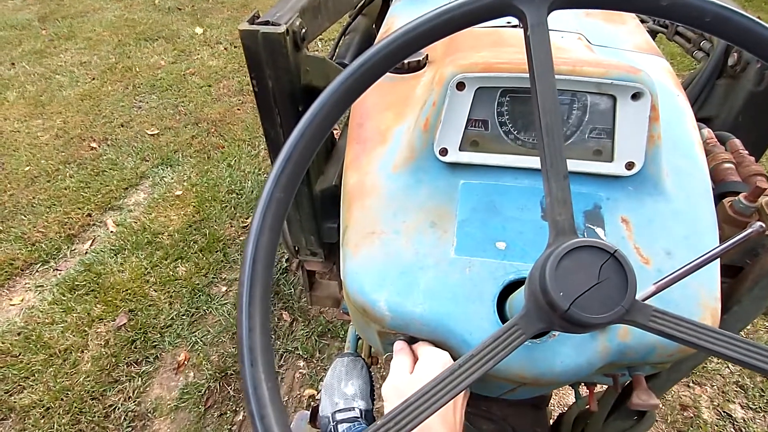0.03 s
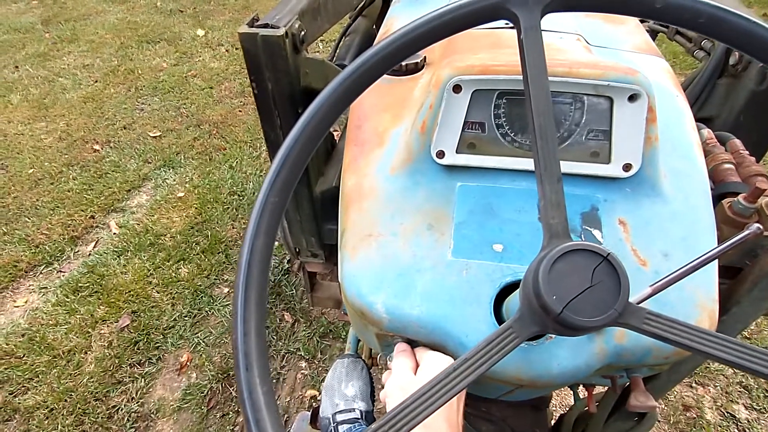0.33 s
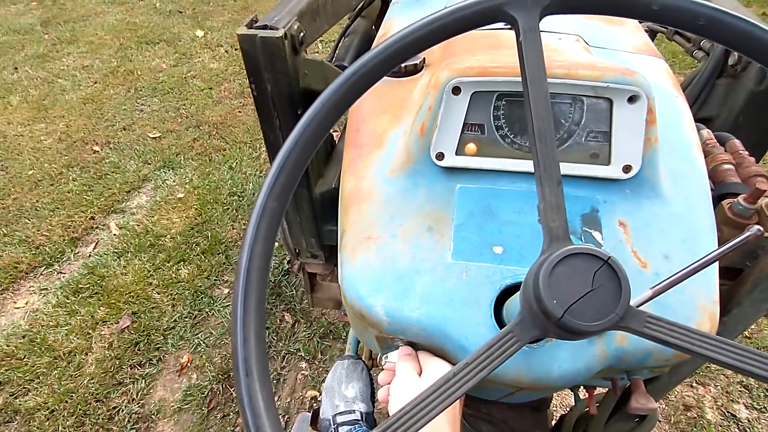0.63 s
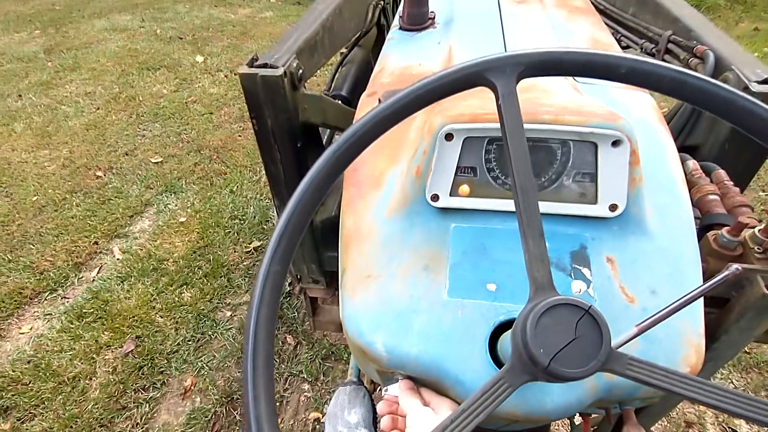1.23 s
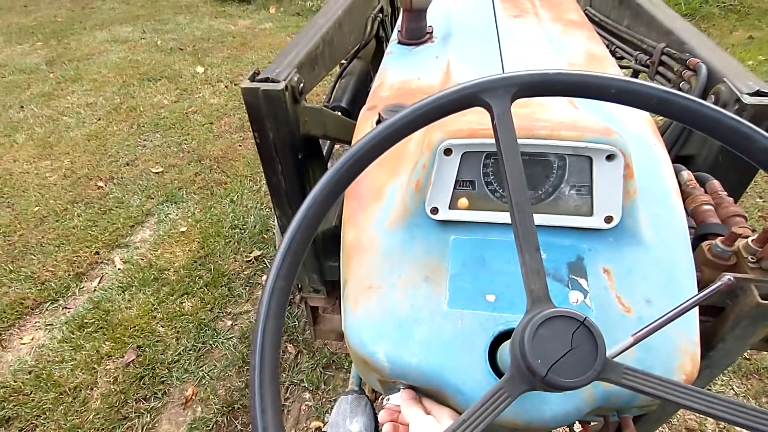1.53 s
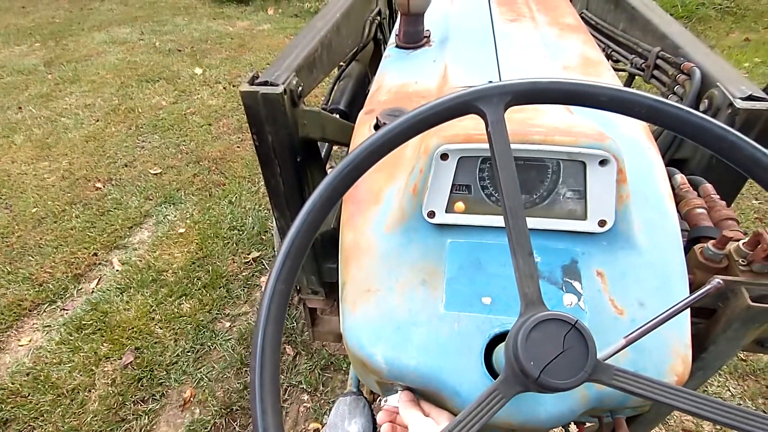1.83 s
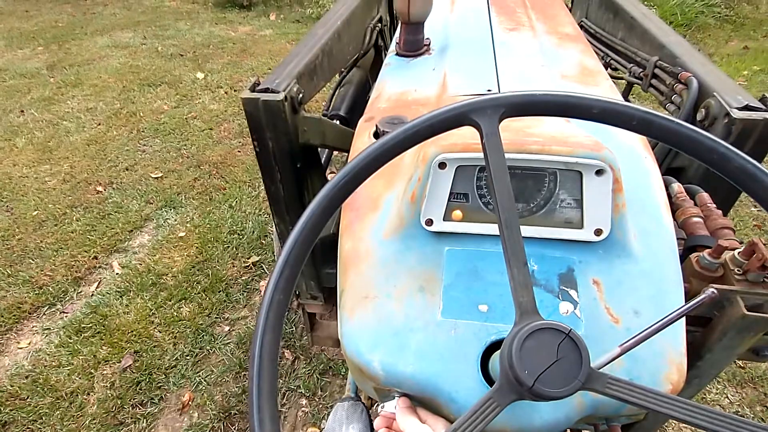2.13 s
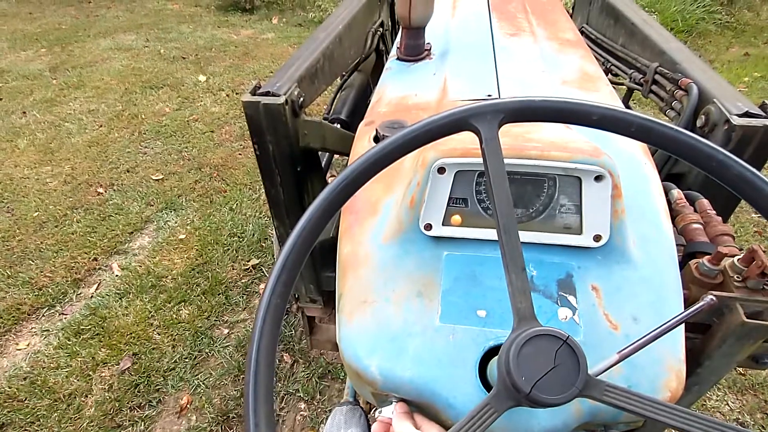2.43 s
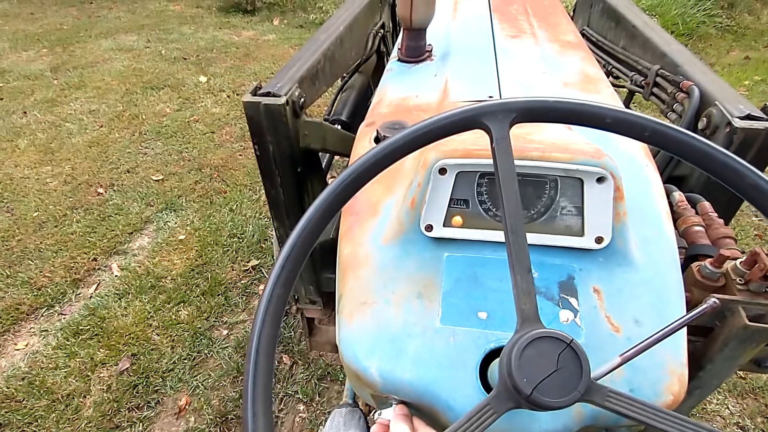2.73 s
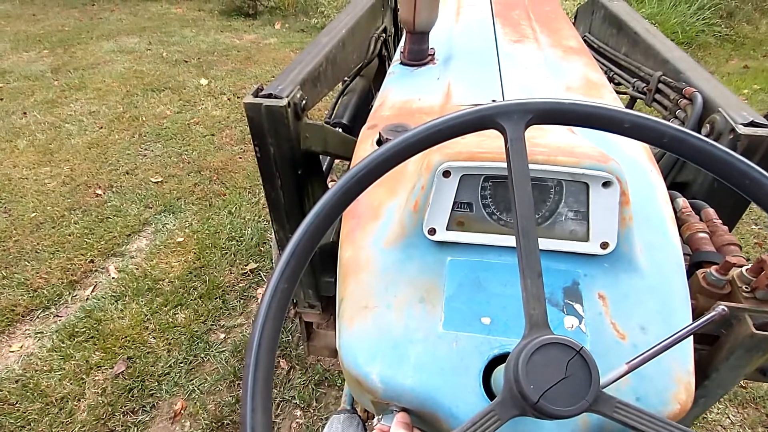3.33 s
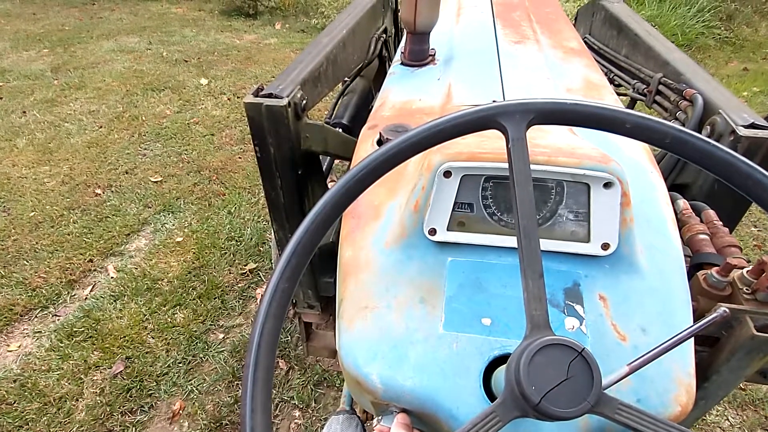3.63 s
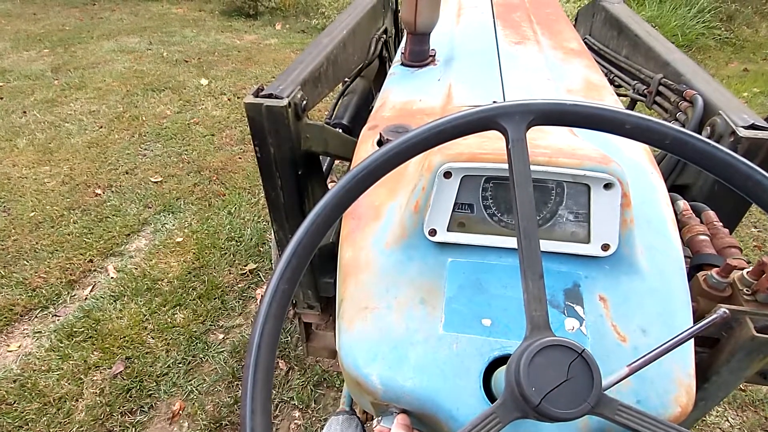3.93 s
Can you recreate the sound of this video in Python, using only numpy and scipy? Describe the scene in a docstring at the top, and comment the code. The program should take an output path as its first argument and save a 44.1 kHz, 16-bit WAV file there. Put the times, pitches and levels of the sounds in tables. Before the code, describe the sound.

An old diesel tractor's starter cranks the engine after two faint key clicks.

```python
"""A lawn, the stereo microphone close to an old diesel tractor. Insects trill far off in the open air.
The key switch clicks twice in the sheet-metal dash while a faint cricket chirps. Some three seconds in,
the starter pinion slams into the ring gear and cranks the engine: the gear whine sags at every
compression and races after it, and each stroke brings a knock and a puff from the exhaust."""
import sys
import numpy as np
from scipy import signal
from scipy.fft import rfft, irfft
from scipy.io import wavfile
from scipy.ndimage import uniform_filter1d

SR = 44100
rng = np.random.default_rng(int(sys.argv[2]) if len(sys.argv) > 2 else 0)


def output_pcm(signal):
    """Save a mono or channel-first signal as 16-bit PCM at the path in sys.argv[1].

    Samples are clipped to [-1, 1] before scaling.
    """
    pcm = np.clip(np.atleast_2d(signal).T, -1, 1) * 32767
    wavfile.write(sys.argv[1], SR, np.round(pcm).astype(np.int16))


N = 176400
T = np.arange(N) / SR

# open air over the lawn: (frequency [Hz], relative level [dB])
AIR_SPECTRUM = [(20, -46), (37, -7.5), (55, 5.5), (116, -4.5), (246, -7), (550, -16.5), (1400, -21.5),
                (1800, -18.5), (4600, -23.5), (5600, -18.5), (9400, -17.5), (10900, -32.5), (15500, -32)]
# its stereo width: (frequency [Hz], side gain [dB])
AIR_SIDE = [(60, -15.5), (290, -9.5), (640, 0)]
# its lean: (frequency [Hz], left over right [dB])
AIR_LEAN = [(6000, 0.5), (8100, -14), (10000, -11), (15000, 3.5)]
# distant insects: (pitch [Hz], pitch spread [Hz], level [dB], pulse rate [Hz], pulse depth [0-1],
# left over right [dB], time of one crest [s], glide [Hz])
INSECT_TRILLS = [(5560, 104.8, -78.5, 24, 0.4, 4, 1.2, 105), (9200, 163, -81.5, 3.6, 1, -17, 1.09, 140),
                 (8750, 133, -81.5, 3.2, 1, -15, 0.078, 66)]
# the key shifting in the fingers: (time [s], pitch [Hz])
FINGER_TICKS = [(0.075, 1270), (3.063, 1000), (3.134, 2540)]
# contacts in the key switch: (time [s], relative level [dB], treble gain [dB])
SWITCH_HITS = [(0.183, -12, -1), (0.1864, -20.5, 16), (0.1892, -9.5, 11), (.197, -0.5, -5),
               (0.6026, -11, -3), (.605, -12, -4.5), (.612, -5, -4), (.618, -5, -6), (0.635, -15, -23)]
# their tone: (frequency [Hz], relative level [dB])
SWITCH_SPECTRUM = [(70, -54), (130, -14.5), (205, -13.5), (290, -3), (420, -9), (600, -12.5), (1000, -10),
                   (1800, -13), (2800, -12.5), (6400, -15.5), (9300, -7.5), (15500, -28)]
# their decay: (frequency [Hz], T60 [s])
SWITCH_DECAY = [(200, 0.27), (1000, 0.15), (3000, 0.081), (10000, 0.043)]
# the switch snaps into its first and second position: (time [s])
DETENTS = [0.190, 0.615]
# modes of the dash: (frequency [Hz], level at first detent [dB], level at second [dB])
DASH_PANEL_MODES = [(289.8, -51.5, -51), (818, -57, -49.5), (888, -58, -54.5), (1034, -51.5, -67),
                    (1435, -46.5, -57.5), (2053, -68, -54), (2270, -53, -59), (2705, -56, -51.5),
                    (2780, -47.5, -59), (3120, -49, -65), (3340, -59, -55), (4430, -46, -72),
                    (5100, -48, -55), (5280, -49, -63)]
# starts of the cricket's chirps: (time [s])
CRICKET_CHIRPS = [.255, .73, 1.21, 1.68, 2.16, 2.605, 3.095]
# the solenoid pulls in and bottoms out: (time [s], frequency [Hz], level [dB], T60 [s])
SOLENOID_PINGS = [(3.342, 772, -52, 0.1), (3.342, 2050, -51, 0.07), (3.406, 2560, -30, .08),
                  (3.406, 2790, -29.5, .07)]
# the pinion thrown at the ring gear: (time [s], relative level [dB], treble gain [dB])
PINION_IMPACTS = [(3.342, -20, -4), (3.364, -10.5, -28), (3.371, -6, 3.5), (3.382, -0.5, 1.5),
                  (3.385, .5, 1.5), (3.408, -13, -20)]
# their tone: (frequency [Hz], relative level [dB])
PINION_SPECTRUM = [(80, -34.5), (136, -2), (446, -10), (569, 0), (809, -1.5), (1830, -8), (2660, -16.5),
                   (4040, -13.5), (6000, -24), (7830, -10), (15500, -33.5)]
# decay of the ironwork: (frequency [Hz], T60 [s])
IRON_DECAY = [(150, 0.89), (1000, 0.18), (3000, 0.23), (8000, 0.1), (15000, 0.16)]
# the chassis takes the load: (time [s], frequency [Hz], level [dB], T60 [s])
CHASSIS_JOLTS = [(3.408, 312, -18, 0.13), (3.424, 178, -25, 0.38), (3.422, 140, -27, 0.41)]
# starter speed: (time [s], tooth mesh rate [Hz])
MESH_RATE = [(3.38, 90), (3.44, 175.7), (3.485, 253.9), (3.53, 260.3), (3.555, 315.1), (3.585, 367.8),
             (3.615, 384.5), (3.655, 368.8), (3.685, 313.9), (3.715, 254), (3.745, 262.6), (3.778, 391.5),
             (3.812, 405.4), (3.85, 393.4), (3.90, 276), (3.93, 273.4), (3.965, 358), (4.0, 412)]
# strength of the drive: (time [s], level [dB])
DRIVE_LEVEL = [(3.36, -60), (3.39, -1), (3.5, -5), (3.62, -5), (3.72, -3.5), (3.825, -5), (3.875, -3),
               (3.92, 2), (4.0, -7.5)]
# how hard the teeth clash: (time [s], level [dB])
CLASH_LEVEL = [(3.62, -1), (3.76, -0.5), (3.815, 4), (3.88, 1.5), (3.98, -5)]
# rasp of the teeth: (frequency [Hz], relative level [dB])
RASP_SPECTRUM = [(600, -1.5), (1300, -3), (1800, -0.5), (2400, -3.5), (3200, 0), (4100, -2.5), (4900, -1.5),
                 (5600, -19.5), (8000, -19.5), (15000, -38.5)]
# gear train under load: (frequency [Hz], relative level [dB])
RUMBLE_SPECTRUM = [(24, -64), (40, -6), (122, 0.5), (284, 7.5), (432, -3.5), (643, -6.5), (910, 2.5),
                   (1060, -3), (1570, -3.5), (2280, -16.5), (3220, -29), (4680, -24.5), (8070, -27.5),
                   (15000, -58.5)]
# modes of castings and bonnet: (frequency [Hz], relative level [dB], T60 [s])
CASTING_MODES = [(136.8, -3.5, 0.45), (173.7, -4.5, 0.92), (248.5, 1, 0.36), (308, -10, 0.19),
                 (376.2, 0, 0.25), (527, -5.5, 0.06), (725, 0, 0.21), (802, -6, 0.19), (953, -4.5, 0.21),
                 (1212, -1, 0.065), (1391, 0, 0.13), (1530, 0, 0.33), (1694, -6.5, .1)]
# gear and motor partials: (multiple of the mesh rate, level at full speed before drive and clash [dB])
WHINE_PARTIALS = [(1, -39), (2, -39), (3, -34.5), (3.7, -46), (4, -44.5), (4.2, -36.5), (5, -44),
                  (7, -48.5), (8, -40.5), (9, -38.5), (9.6, -40.5), (10, -37), (10.8, -39.5), (12, -49)]
# compression strokes: (time [s], knock level [dB], puff level [dB], strain level [dB])
COMPRESSIONS = [(3.53, -38.5, -37, -34.5), (3.724, -33, -54, -25), (3.904, -28, -35, -30.5)]
# the block straining: (frequency [Hz], relative level [dB])
STRAIN_SPECTRUM = [(140, -22), (290, 0.5), (420, -17), (540, 4.5), (630, -4.5), (800, 5), (1200, -9),
                   (1600, -3.5), (2300, -21), (6000, -56)]
# knock at the top of a stroke: (frequency [Hz], relative level [dB])
KNOCK_SPECTRUM = [(500, -8), (1000, 7), (2400, -9), (4300, 2), (5800, -9.5), (9400, -18), (10400, -9.5),
                  (11600, -32), (15000, -41)]
# exhaust puff: (frequency [Hz], relative level [dB])
PUFF_SPECTRUM = [(25, -29), (45, -19), (70, -16), (100, 19), (160, -2), (400, -38)]
# the tractor's width at the microphone: (frequency [Hz], side gain [dB])
TRACTOR_SIDE = [(60, -26), (150, -20.5), (300, -15), (640, -8), (1200, 0), (15000, 0)]
# its lean: (frequency [Hz], left over right [dB])
TRACTOR_LEAN = [(380, 0), (700, 2), (1300, 6), (2400, 2.5), (6000, 1.5), (8100, -11), (15000, -6)]


def amp(db):
    """Decibels to gain."""
    return 10 ** (np.asarray(db) / 20)


def unit(x):
    """Scale to rms 1."""
    return x / np.sqrt(np.mean(x ** 2) + 1e-20)


def at_hz(points, hz):
    """Read a table on a log-frequency axis."""
    freqs, values = np.transpose(points)
    return np.interp(np.log(np.maximum(hz, 1)), np.log(freqs), values)


def scattered(x, response):
    """Convolve with a two-channel response, scaled to unit power in its first channel."""
    return signal.fftconvolve(x, response / np.linalg.norm(response[0]), axes=1)[:, :N]


def coloured(x, spectrum, size=8192):
    """Causal filter with the given spectrum and unit power gain."""
    cepstrum = irfft(np.log(amp(at_hz(spectrum, np.fft.rfftfreq(size, 1 / SR)))))
    cepstrum[1:size // 2] *= 2
    cepstrum[size // 2 + 1:] = 0
    return scattered(x, irfft(np.exp(rfft(cepstrum)))[None])


def white():
    """Two channels of unrelated noise."""
    return rng.standard_normal((2, N))


def drift(hz):
    """Two channels of random wander below hz, rms 1."""
    return unit(signal.sosfilt(signal.butter(2, hz, fs=SR, output="sos"), white()))


def ring(x, hz, t60):
    """One driven mode; white noise keeps its power through it."""
    radius, step = amp(-60 / (t60 * SR)), 2 * np.pi * hz / SR
    mode = signal.lfilter([0, np.sin(step)], [1, -2 * radius * np.cos(step), radius ** 2], x + 1e-18)
    return mode * np.sqrt(4 * np.log(1000) / (t60 * SR))


def ping(start, hz, db, t60):
    """One mode struck once; the side swings a quarter cycle off the mid."""
    age = np.maximum(T - start, 0)
    phase = 2 * np.pi * hz * age
    return (age > 0) * amp(db - 60 * np.minimum(age / t60, 3)) * np.array([np.sin(phase), np.cos(phase)])


def dense_ring(decay, size=22050):
    """Response of countless close modes: noise that dies band by band."""
    spectrum, hz = rfft(rng.standard_normal((2, size))), np.fft.rfftfreq(size, 1 / SR)
    centres = np.geomspace(100, 15000, 12)
    band = np.abs(np.log((hz[:, None] + 1) / centres)).argmin(axis=1)
    return sum(irfft(spectrum * (band == k)) * amp(-60 * T[:size] / at_hz(decay, centre))
               for k, centre in enumerate(centres))


def impacts(hits, decay, spectrum, crack_db=-3.5, crack_s=0.0015, treble_hz=3000):
    """Metal contacts: a short crack, then a ring, each with its own brightness."""
    out = np.zeros((2, N + SR))
    for start, db, treble_db in hits:
        hit = dense_ring(decay)
        hit *= 1 + amp(crack_db) * np.exp(-T[:hit.shape[1]] / crack_s)
        dull = signal.sosfilt(signal.butter(1, treble_hz, fs=SR, output="sos"), hit)
        first = int(start * SR)
        out[:, first:first + hit.shape[1]] += amp(db) * (dull + amp(treble_db) * (hit - dull))
    return coloured(out[:, :N], spectrum)


def placed(x, width, balance):
    """Mid and side to the microphone's left and right."""
    hz = np.fft.rfftfreq(2 * N, 1 / SR)
    mid, side = rfft(x, 2 * N)
    side *= amp(at_hz(width, hz))
    lean = amp(at_hz(balance, hz))
    return irfft(np.array([(mid + side) * lean, mid - side]) * np.sqrt(2 / (1 + lean ** 2)))[:, :N]


def open_air(db=-69.5):
    """A steady low hush all around the microphone."""
    return placed(amp(db) * coloured(white(), AIR_SPECTRUM), AIR_SIDE, AIR_LEAN)


def insects(sharpness=1.3):
    """Far off in the grass, narrow trills pulse and glide in pitch with each pulse."""
    out = 0
    for hz, spread_hz, db, rate, depth, pan_db, crest_s, glide_hz in INSECT_TRILLS:
        beat = 2 * np.pi * rate * (T - crest_s) + 0.35 * drift(2)[0]
        pitch = hz + glide_hz * np.sin(beat) + spread_hz * drift(spread_hz)
        tone = unit(np.cos(2 * np.pi * np.cumsum(pitch, axis=1) / SR))
        pulses = unit((1 + depth * np.cos(beat)) ** sharpness)
        out += amp(db + np.array([[0.5], [-0.5]]) * pan_db) * tone * pulses
    return out


def key_ticks():
    """The key ticks faintly as it shifts in the fingers."""
    return sum(ping(start, hz, db=-69.5, t60=0.046) for start, hz in FINGER_TICKS)


def key_switch(contact_db=-40, tail_db=-18.5, tail_t60=0.45):
    """Contacts snap, each detent rings the dash in its own way and a faint open-air tail follows."""
    clicks = amp(contact_db) * impacts(SWITCH_HITS, SWITCH_DECAY, SWITCH_SPECTRUM)
    for hz, *levels_db in DASH_PANEL_MODES:
        t60 = 1.05 * at_hz(SWITCH_DECAY, hz)  # the dash just outlasts the contacts
        clicks += sum(ping(start, hz, db, t60) for start, db in zip(DETENTS, levels_db))
    tail = signal.lfilter([0.2], [1, -0.8], white()) * amp(-60 * T / tail_t60)
    return clicks + amp(tail_db) * scattered(clicks, tail)


def cricket(hz=6780, chirp_s=0.096, pulse_hz=58.6, db=-72.5):
    """One faint cricket, dead centre: each chirp is a quick run of pulses on a wavering tone."""
    out = 0
    for start in CRICKET_CHIRPS:
        age = T - start
        pulses = (age > 0) * (age < chirp_s) * np.sin(np.pi * pulse_hz * age) ** 2
        pitch = hz + 50 * drift(200)[0]
        out += amp(db) * pulses * np.sin(2 * np.pi * np.cumsum(pitch) / SR)
    return out


def pinion_engagement(pinion_db=-26.5, jolt_attack_s=0.013):
    """The solenoid pings, the pinion slams home and the chassis booms."""
    out = sum(ping(*mode) for mode in SOLENOID_PINGS)
    out += amp(pinion_db) * impacts(PINION_IMPACTS, IRON_DECAY, PINION_SPECTRUM)
    for start, hz, db, t60 in CHASSIS_JOLTS:
        age = np.maximum(T - start, 0)
        out += amp(db - 60 * age / t60) * np.minimum(age / jolt_attack_s, 1) * np.sin(2 * np.pi * hz * age)
    return out


def starter(full_speed_hz=408.7, jitter=0.007, rasp_db=-33, rumble_db=-30.5, castings_db=-41.5):
    """Meshing teeth whine, rasp when racing and shake the castings when labouring."""
    mesh_hz = uniform_filter1d(np.interp(T, *np.transpose(MESH_RATE)), size=700)
    octaves = np.log2(mesh_hz / full_speed_hz)
    phase = 2 * np.pi * np.cumsum(mesh_hz * (1 + jitter * drift(118)[0])) / SR
    drive = amp(np.interp(T, *np.transpose(DRIVE_LEVEL)))
    clash = amp(np.interp(T, *np.transpose(CLASH_LEVEL)))
    teeth = drive * unit(np.exp(0.48 * np.cos(phase) + 0.068 * drift(175)[0]))  # one swell per tooth
    load = amp(-np.maximum(octaves, -0.7))  # up 1 dB per octave of slowing
    rasp = coloured(white() * teeth * clash * amp(rasp_db + 16 * octaves), RASP_SPECTRUM)
    rumble = coloured(white() * teeth * load * amp(rumble_db), RUMBLE_SPECTRUM)
    shake = white() * teeth * load
    castings = sum(amp(castings_db + db) * ring(shake, hz, t60) for hz, db, t60 in CASTING_MODES)
    return gear_whine(phase, octaves, drive * np.sqrt(clash)) + rasp + rumble + castings


def gear_whine(mesh_phase, octaves, drive, motor_lag_s=0.015, housing_db=-3, flare_db=6, flare_hz=24.6):
    """Rough partials scatter in the housing and flare as they sweep across the modes of the castings."""
    motor_phase = np.interp(T - motor_lag_s, T, mesh_phase)
    whine = 0
    for order, db in WHINE_PARTIALS:
        # fractional multiples come from the motor's other turning parts
        phase = mesh_phase if order == round(order) else motor_phase
        side_shift = np.array([[0], [np.pi / 2]]) * rng.choice([-1, 1])
        level = drive * amp(db + 8 * min(order - 1, 6) * octaves)  # brighter with speed
        flutter = 1 + 0.3 * np.sqrt(order / 4) * drift(hz=109)
        tone = np.sqrt(2) * np.sin(order * phase + rng.uniform(0, 2 * np.pi) + side_shift)
        whine += level * flutter * tone
    housing = scattered(whine, dense_ring(IRON_DECAY))
    flare = sum(signal.lfilter(*signal.iirpeak(hz, Q=hz / flare_hz, fs=SR), whine)
                for hz, _, _ in CASTING_MODES)
    return whine + amp(housing_db) * housing + amp(flare_db) * flare


def cylinders(knock_attack_s=0.0089, knock_hold_s=0.0037, knock_t60=0.13):
    """Each compression strains the block, knocks at the top and puffs through the exhaust."""
    strain_lead_s, strain_width_s = 0.005, 0.028
    puff_lag_s, puff_width_s = 0.019, 0.011
    strain = knock = puff = 0
    for start, knock_db, puff_db, strain_db in COMPRESSIONS:
        age = T - start
        strain += amp(strain_db) * np.exp(-((age + strain_lead_s) / strain_width_s) ** 2)
        fall_db = 60 * np.maximum(age - knock_attack_s - knock_hold_s, 0) / knock_t60
        knock += np.clip(age / knock_attack_s, 0, 1) * amp(knock_db - fall_db)
        puff += amp(puff_db) * np.exp(-((age - puff_lag_s) / puff_width_s) ** 2)
    return (coloured(white() * knock, KNOCK_SPECTRUM) + coloured(white() * puff, PUFF_SPECTRUM)
            + coloured(white() * strain, STRAIN_SPECTRUM))


def scene(bass_cut_hz=57):
    """The tractor close to the microphone, radiating little deep bass; the lawn all around."""
    tractor = key_ticks() + key_switch() + pinion_engagement() + starter() + cylinders()
    tractor = placed(tractor, TRACTOR_SIDE, TRACTOR_LEAN)
    tractor = signal.sosfilt(signal.butter(2, bass_cut_hz, "high", fs=SR, output="sos"), tractor)
    return tractor + open_air() + insects() + cricket()


def record(dry):
    """The top is cut steeply above 15.9 kHz."""
    return signal.sosfilt(signal.ellip(12, 0.1, 80, 15900, fs=SR, output="sos"), dry)


dry = scene()
out = record(dry)
output_pcm(out)
```